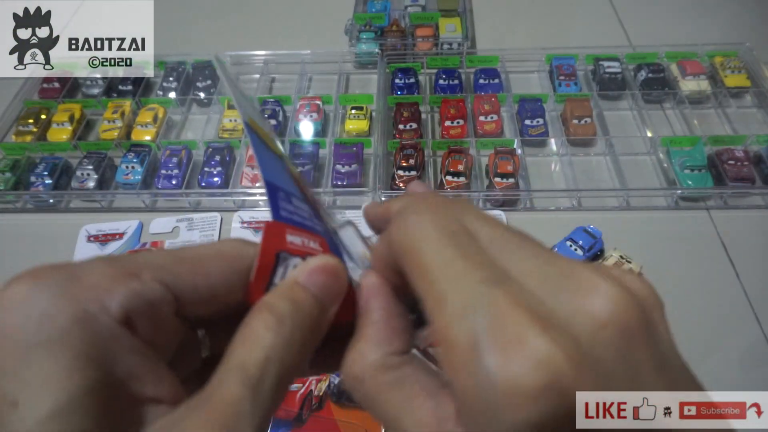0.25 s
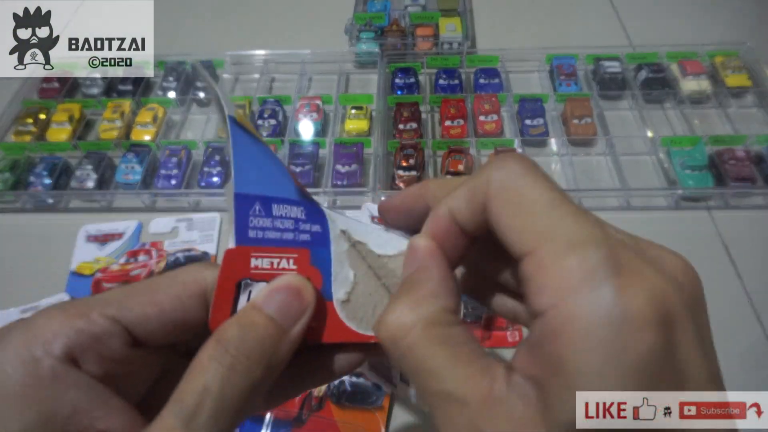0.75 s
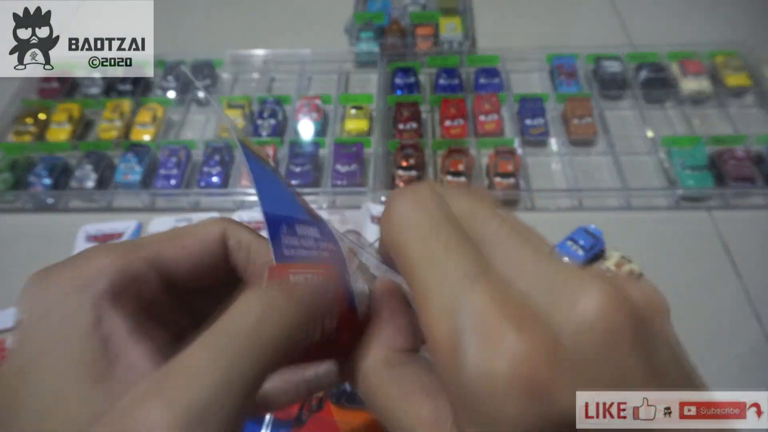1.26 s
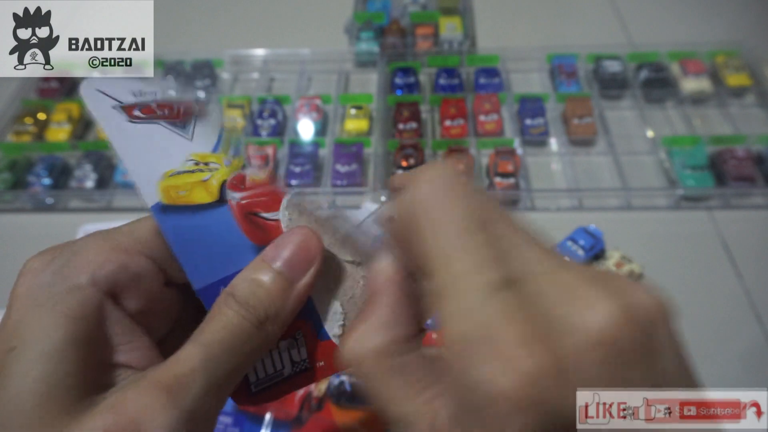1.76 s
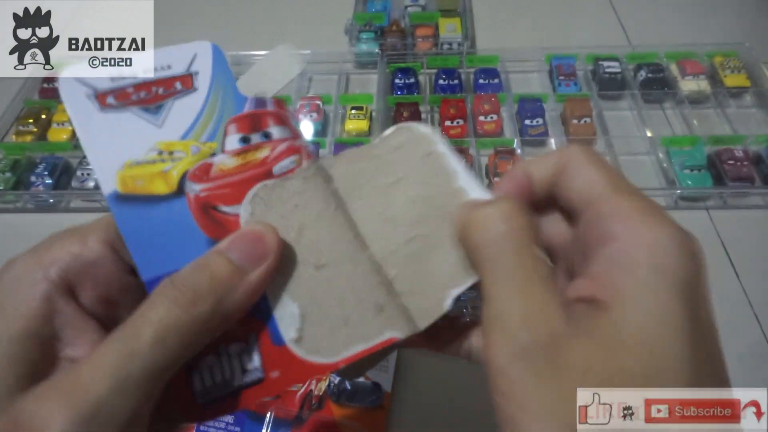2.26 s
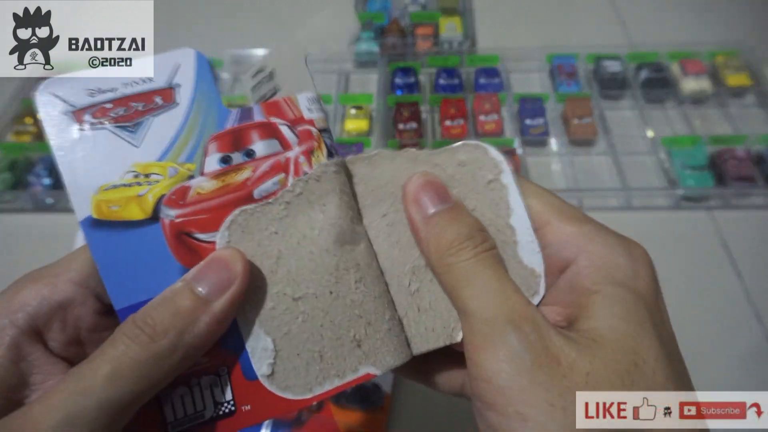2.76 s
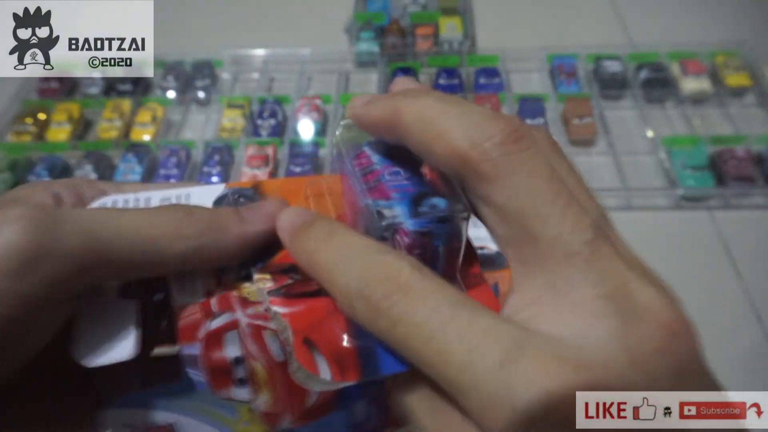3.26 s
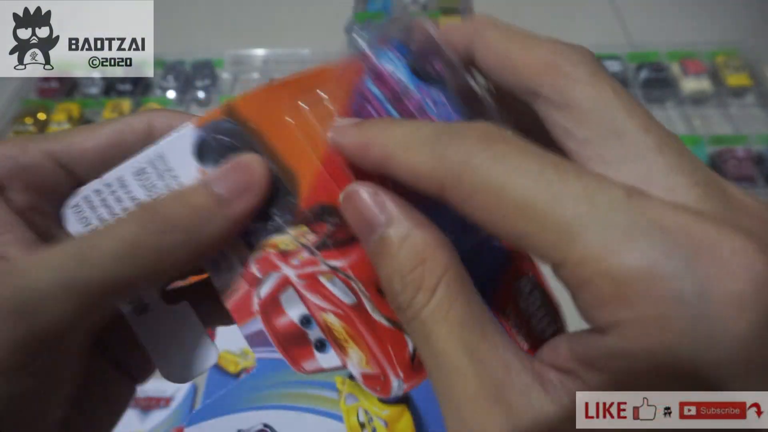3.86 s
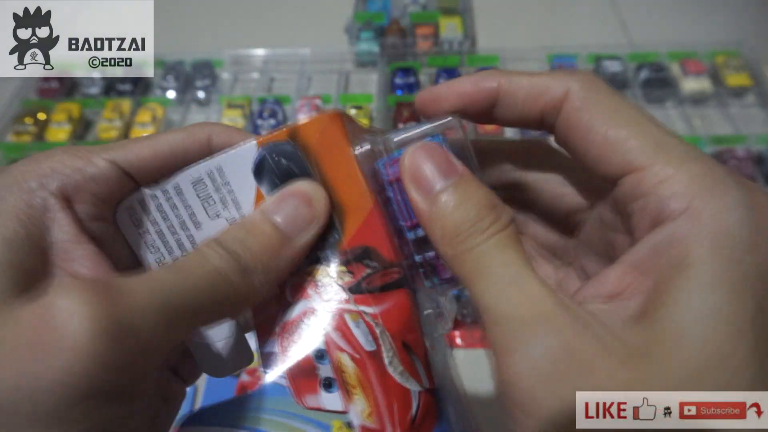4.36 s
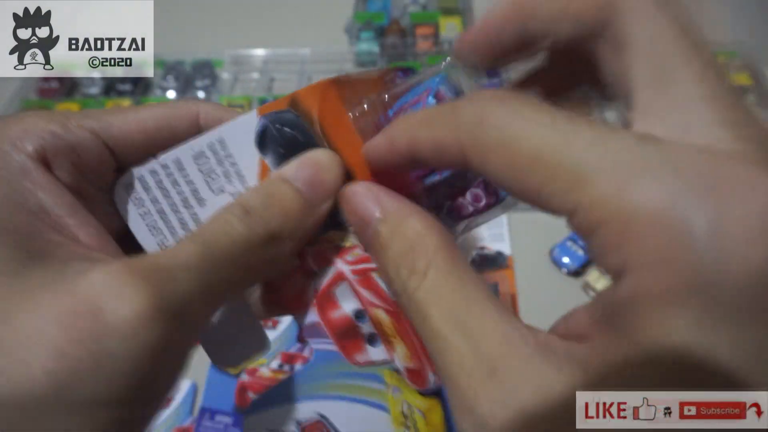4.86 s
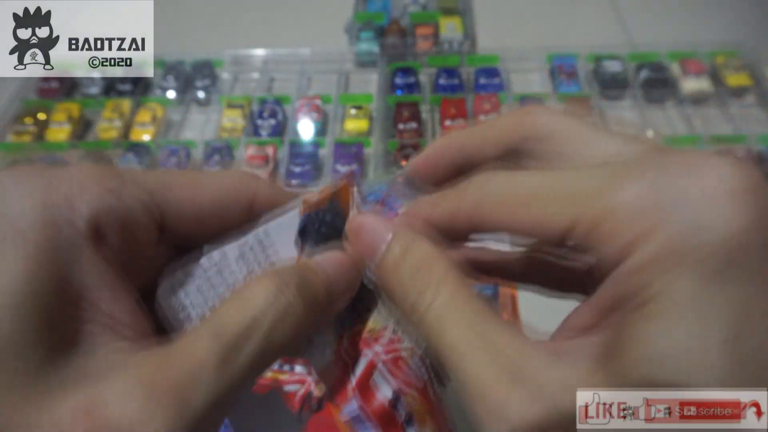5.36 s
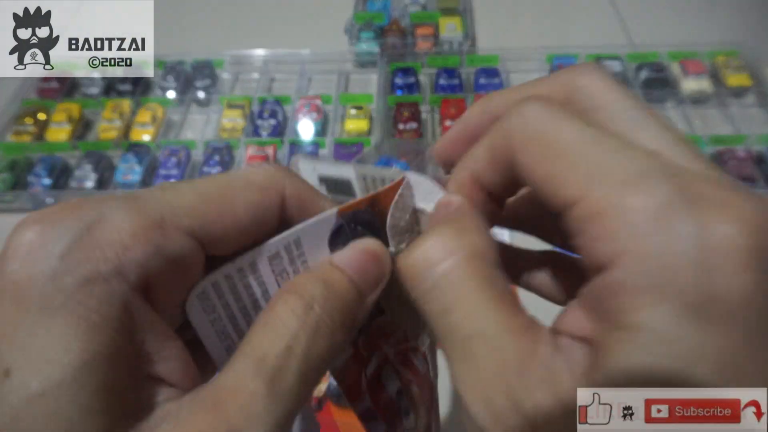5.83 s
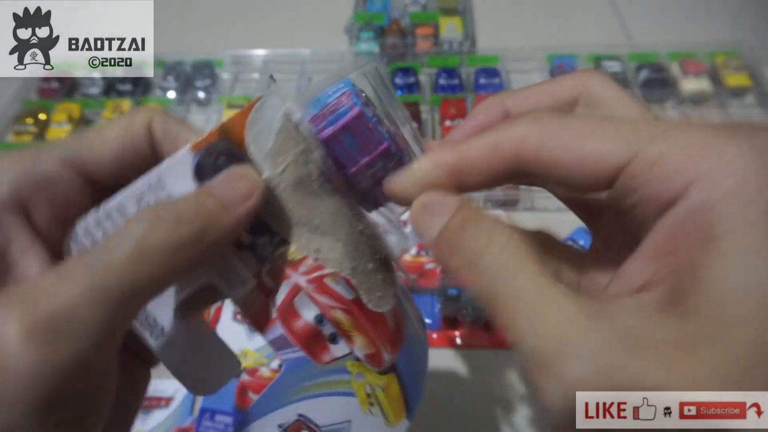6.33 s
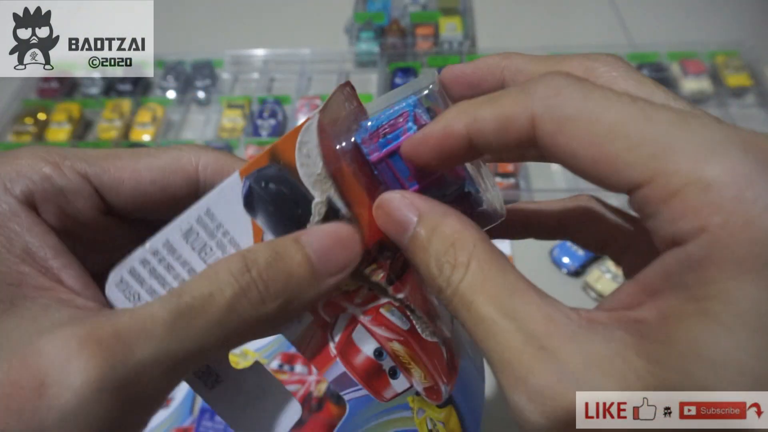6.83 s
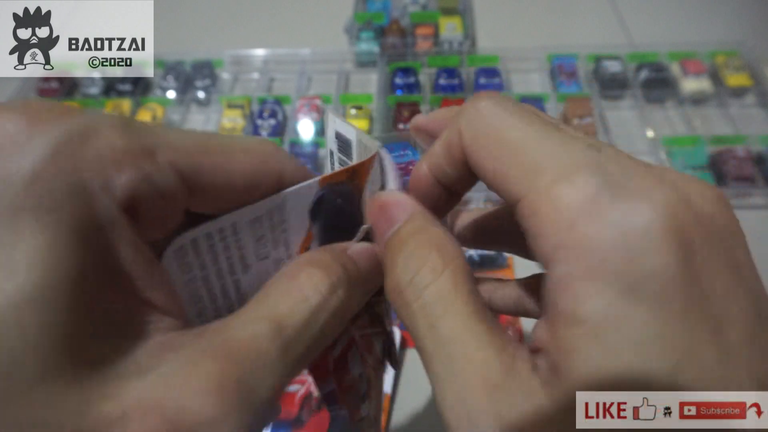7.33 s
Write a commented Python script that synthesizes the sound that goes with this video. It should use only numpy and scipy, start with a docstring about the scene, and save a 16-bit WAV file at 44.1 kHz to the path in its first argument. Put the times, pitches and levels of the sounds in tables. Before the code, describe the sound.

Crisp dry ticks of glue letting go lead into rough cardboard tearing and loud buckling of thin plastic, all near the microphones and slightly stronger on the right in its lower body. Handling rustles and scattered bright clicks with dull card thumps continue, with sparse small peels later. Soft fan air and low motor hum stay underneath; a very faint high whine appears at the close.

```python
"""Two hands pull the cardboard backing off a plastic blister pack, close to the microphones in a small room.
Glue crackles in short first pulls, with a few snaps; from about 1.7 s the backing tears hard.
Then come rubbing fingers, many ringing snaps of the bending shell, and more short peels up to the end.
Tearing is made of dense tiny noise bursts; each snap is a click, a short ring and a dull push.
A fan hums behind it all, and a very faint whine comes up in the last second."""
import sys
import numpy as np
from scipy import signal
from scipy.fft import rfft, irfft
from scipy.io import wavfile
from scipy.ndimage import uniform_filter1d

SR = 44100
rng = np.random.default_rng(int(sys.argv[2]) if len(sys.argv) > 2 else 0)


def unload_wav(signal):
    """Save mono or channel-first audio to the path in sys.argv[1] as 16-bit WAV at rate SR, clipped to [-1, 1]."""
    wavfile.write(
        sys.argv[1],
        SR,
        np.round(np.clip(np.atleast_2d(signal).T, -1, 1) * 32767).astype(np.int16),
    )


N = 334719
TIME = np.arange(N) / SR

# Pack levels below are set before the hollow, the room and the final mix.
# pulls that peel the backing: [start t/s, length t/s, glue level/dB, fibre level/dB,
# flexing card level/dB, swell from start to end level/dB]
PEELS = [(.16, 0.16, -46, -64, -63, 23), (0.297, .13, -33, -49.5, -62, 0.5),
         (.44, 0.17, -42.5, -54.5, -68, 3), (0.572, 0.22, -33, -42.5, -55, 8),
         (1.728, 0.045, -30.5, -37, -40.5, 1.5), (1.781, 0.051, -26.5, -25.5, -34.5, 1.5),
         (1.853, .115, -32.5, -38.5, -39, 6), (1.97, .19, -30, -34, -33.5, 0.5),
         (2.167, 0.05, -25, -27.5, -28.5, -0.5), (2.462, 0.084, -40, -34.5, -30.5, -2),
         (2.568, 0.098, -40, -38.5, -39, 0.5), (2.671, 0.15, -34, -38, -38, 5),
         (4.542, 0.012, -31, -39, -42.5, -3.5), (5.169, .1, -38.5, -43, -48, 1.5),
         (5.796, 0.04, -33.5, -36, -44.5, -1), (6.016, .14, -38.5, -43, -48, 2.5),
         (6.233, .026, -41, -39, -38, 4), (6.266, 0.073, -41, -38, -37.5, -2.5),
         (7.386, 0.11, -34.5, -46.5, -50.5, 2), (7.474, 0.14, -36, -39.5, -44, 2.5)]
PEEL_ATTACK_S, PEEL_RELEASE_S = 0.014, 0.027
# fingers slide and regrip on the shell: [start t/s, length t/s, level/dB, brightness level/dB]
RUBS = [(0.913, .1, -51, 4), (1.149, .15, -46, 1.5), (1.345, 0.074, -50, 2), (1.578, .015, -48.5, -1),
        (2.292, 0.087, -42.5, -8), (2.913, 0.087, -40.5, -3), (3.022, 0.097, -49, -6),
        (3.144, .4, -53.5, -3), (3.283, 0.058, -39, -3), (3.39, 0.047, -46.5, -5),
        (3.536, 0.014, -44.5, -4), (3.605, .17, -40.5, -10), (3.838, 0.062, -47.5, -5),
        (3.966, 0.14, -50, -0.5), (4.13, 0.2, -60, 8), (4.665, 0.075, -45.5, -6.5),
        (4.902, 0.076, -38, -12), (5.007, 0.051, -49, -2.5), (5.292, 0.14, -60.5, 11.5),
        (5.487, 0.3, -61.5, 7), (5.875, 0.23, -55, 3), (6.352, 0.076, -42, -6.5), (6.504, .03, -47, -5.5),
        (6.571, 0.11, -47, -2.5), (6.697, .02, -45.5, 4), (6.793, 0.052, -47.5, -2.5),
        (6.968, 0.11, -54.5, 0), (7.291, .08, -62.5, 10)]
RUB_ATTACK_S, RUB_RELEASE_S, RUB_SWELL_DB = 0.012, 0.028, -2.5
RUB_FIBRE_DB, RUB_FIBRE_SHARE = -0.5, 0.55  # the fibres' scrape follows this share of the brightness
HOLD_DB = -63.5  # the pack never lies quite still in the hands


def pulling():
    """How hard card, fibres and glue are worked; the strongest move of the moment leads."""
    work = np.full((3, N), undb(HOLD_DB))
    for start, length, glue_db, fibre_db, flex_db, swell_db in PEELS:
        shape = stroke(start, length, swell_db, PEEL_ATTACK_S, PEEL_RELEASE_S)
        levels = undb([flex_db, fibre_db, glue_db])
        work = np.maximum(work, np.outer(levels, shape))
    for start, length, db, bright_db in RUBS:
        shape = stroke(start, length, RUB_SWELL_DB, RUB_ATTACK_S, RUB_RELEASE_S)
        fibre_db = db + RUB_FIBRE_DB + RUB_FIBRE_SHARE * bright_db
        levels = undb([db, fibre_db, db + bright_db])
        work = np.maximum(work, np.outer(levels, shape))
    return work


def stroke(start, length, swell_db, attack, release):
    """Envelope of one move of the hand: it takes hold, swells or eases, and dies away."""
    t = TIME - start
    rise = np.minimum(t, 0) / attack
    fall = np.maximum(t - length, 0) / release
    progress = np.clip(t / length, 0, 1)
    return np.exp(rise - fall) * undb(swell_db * (progress - 0.5))


# colour of the flexing card and shell: [f/Hz, relative level/dB]
FLEX = [(100, -48), (250, -9.5), (460, -6), (750, 1.5), (1100, 2), (1450, -1), (1800, 6), (2250, 5),
        (2750, 4), (3400, 4.5), (4800, -8), (8000, -32.5)]
# colour of breaking fibres: [f/Hz, relative level/dB]
FIBRE = [(1200, -41), (2400, -4), (3400, -1), (5000, 1), (6300, -4.5), (7800, -5.5), (10000, -7.5),
         (16000, -40)]
# colour of glue letting go: [f/Hz, relative level/dB]
GLUE = [(3000, -54.5), (6300, -3.5), (8500, 3.5), (11000, 3), (13000, 5), (16000, -2.5)]


def tearing(flex, fibre, glue, crinkle=0.23):
    """Larger breaks jolt glue, fibres and card together; smaller slips in each go their own way.

    A harder pull packs most of them closer together."""
    effort = np.clip(np.hypot(flex, fibre) / undb(-40), 0.3, 6)
    # whole fibre bundles give way and jolt every part of the pack
    bundles = slips(rate=420 * np.sqrt(effort), spread_db=5, t60=0.003)

    card_slips = slips(rate=700 * effort, spread_db=1.5, t60=0.03)
    flexing = bent(0.68 * bundles + card_slips, FLEX, bend=0.092, rate=8.9)
    flexing += crinkle * crinkles(rate=140 * effort, centre_hz=1917, spread_octaves=0.4108,
                                  t60=0.02, spread_db=8.0)

    fibre_slips = slips(rate=2500 * effort, spread_db=-1, t60=0.0075)
    breaking = bent(0.5 * bundles + fibre_slips, FIBRE, bend=0.1, rate=16)

    # spots of glue pop off one by one above the fine hiss of the peel
    spots = slips(rate=260 * np.sqrt(effort), spread_db=5, t60=0.0012)
    hiss = slips(rate=6800, spread_db=2.5, t60=0.003)
    peeling = through(0.7 * bundles + 0.87 * spots + hiss, response(GLUE))

    grip = unit(undb(1.56 * walk(rate=55)))  # the pull advances in small jerks
    return grip * (flex * unit(flexing) + fibre * breaking + glue * unit(peeling))


def slips(rate, spread_db, t60, count=28):
    """Tiny fractures of unequal size, rate a second at even power; each is a short burst of micro-cracks."""
    happens = rng.random(N) < rate / SR
    sizes = happens / np.sqrt(rate) * undb(spread_db * np.minimum(rng.standard_normal(N), 2))
    family = rng.integers(0, count, N)  # which of the ready-made bursts each slip uses
    t = TIME[:SR // 50]
    bursts = rng.standard_normal((count, len(t))) * fade(t, t60)
    return unit(sum(through(sizes * (family == k), unit_energy(bursts[k])) for k in range(count)))


def bent(x, colour, bend, rate, count=4):
    """Bending stiffens and slackens the sheet, so that its resonances wander up and down."""
    stretches = np.exp(np.linspace(-bend, bend, count))
    shapes = [response([(hz * k, db) for hz, db in colour]) for k in stretches]
    return unit(shifting(x, shapes, rate))


def crinkles(rate, centre_hz, spread_octaves, t60, spread_db):
    """Small creases pop one after another, each with a brief pitch of its own."""
    out, t = np.zeros(N + SR), TIME[:SR // 25]
    starts = np.flatnonzero(rng.random(N) < rate / SR)
    chance = np.clip(rng.standard_normal((len(starts), 2)), -2, 2)
    for start, (pitch, size) in zip(starts, chance):
        hz = centre_hz * 2 ** (spread_octaves * pitch)
        out[start:start + len(t)] += undb(spread_db * size) * np.cos(2 * np.pi * hz * t) * fade(t, t60)
    return unit(out[:N])


# the shell buckles: [t/s, snap level/dB, ring f/Hz, brightness level/dB against the snap]
SNAPS = [(.159, -54, 2500, -2), (.6389, -48.5, 1460, 9), (.909, -43.5, 1470, -9), (.9515, -32.5, 2130, 4),
         (1.0065, -46, 1600, -8), (1.0348, -43.5, 970, -14), (1.1264, -38, 1360, -13),
         (1.1987, -39.5, 2550, -4), (1.4064, -38, 2797, -7.5), (1.588, -45, 2130, -3.5),
         (1.7671, -28, 3580, 2.5), (1.7739, -30, 3480, 2), (1.985, -36.5, 3430, 5.5),
         (2.2169, -24, 1996, -6), (2.2671, -29.5, 2650, -3.5), (2.3159, -30, 2340, -26),
         (2.3804, -34, 1040, -14), (2.462, -24.5, 1480, -11), (2.4702, -24, 3240, -27),
         (2.4958, -27, 1550, -11), (2.5069, -28.5, 1370, -5), (2.5461, -26, 1500, -8),
         (2.6234, -32, 2415, 0), (2.838, -27, 3210, -22), (2.9262, -24, 2290, -10.5),
         (3.0627, -34.5, 2184, -6.5), (3.3841, -36, 1505, -13), (3.4034, -42, 1490, 7),
         (3.479, -42, 1513, -21), (3.6218, -32, 2510, -8.5), (3.6492, -34.5, 1510, -10),
         (3.6971, -35.5, 2520, 0.5), (3.7293, -31, 1270, -14.5), (3.7596, -30, 1480, -17),
         (3.767, -29, 2290, -15.5), (3.8418, -44, 1406, -19), (3.873, -43.5, 1365, -16),
         (4.008, -39.5, 1400, -16), (4.051, -38.5, 1380, -10), (4.0745, -39.5, 1450, -15),
         (4.0933, -34, 1327, -6), (4.2438, -24.5, 2010, -11.5), (4.2478, -35, 1420, -5),
         (4.5641, -30.5, 993, -5.5), (4.662, -29, 2270, -12), (4.7068, -29, 2140, -7.5),
         (4.7994, -29.5, 1300, -13.5), (4.8055, -34, 1530, -15), (4.9132, -37, 2470, -14),
         (4.9401, -36, 3124, -28), (4.9828, -34.5, 2380, -5), (5.1474, -24, 2930, -11.5),
         (5.1698, -32, 2830, -12), (5.8658, -39.5, 3520, -3), (6.261, -28.5, 1528, 2),
         (6.4796, -30, 1218, -15), (6.5078, -32, 1670, -27.5), (6.5642, -35, 1580, -6),
         (6.5693, -33, 890, -14), (6.6033, -28, 1560, -7.5), (6.8447, -41.5, 1730, -15),
         (7.1304, -37, 1155, -35), (7.483, -27, 2795, -3), (7.5274, -34.5, 1320, -18)]
# modes of a buckling facet: [multiple of its ring pitch, relative level/dB]
FACET = [(.66, -4), (1.001, 10), (1.21, 2.5), (1.53, -0.5), (2.1, -5.5)]
# dull push of the card when the shell gives: [f/Hz, relative level/dB]
THUD = [(40, -23), (150, -7.5), (280, 5.5), (460, 14), (700, 6), (1200, -33), (4000, -30)]
RING_CYCLES = 21  # a facet rings for this many cycles, so that low ones last longer
SNAP_THUD_DB = -17.5  # the push on the card, against the ring and crease
SNAP_CRACK_DB, SNAP_CRACK_SHARE = 3.5, 0.81  # the crack rises by this share of the brightness
EVENT_TIME = TIME[:SR // 12]  # room for one snap, pop or knock


def snaps(flex):
    """A facet flips: a sharp crack and tick, a few cycles of its own ring, and a push on the card."""
    out, t = np.zeros(N + SR), EVENT_TIME
    thud_h, flex_h = response(THUD), response(FLEX)
    swing = 1 - np.exp(-t / 0.00025)  # the facet takes a moment to flip
    radiation = signal.butter(2, 500, "high", fs=SR, output="sos")  # so small a sheet gives off little bass
    for s, snap_db, hz, bright_db in list(SNAPS) + lesser_snaps(flex):
        detune = 1 + 0.061 * rng.standard_normal(len(FACET))
        detune[1] = 1  # the main mode keeps its pitch
        ring = sum(undb(db) * np.sin(2 * np.pi * hz * k * d * t) for (k, db), d in zip(FACET, detune))
        ring = unit_energy(ring * swing * fade(t, RING_CYCLES / hz))
        scrape = 0.65 * burst(flex_h, 0.018, first=0.7)  # the crease runs on through the sheet
        snap = unit_energy(signal.sosfilt(radiation, ring + scrape))
        snap += undb(SNAP_THUD_DB) * burst(thud_h, 0.031, first=2.26)
        snap += click(SNAP_CRACK_DB + SNAP_CRACK_SHARE * bright_db, bright_db)
        add_event(out, s, snap_db, snap)
    return out[:N]


# lesser facets: level against the flexing, pitch spread around a centre
LESSER_PER_S, LESSER_DB, LESSER_SPREAD_DB, LESSER_HZ, LESSER_BRIGHT_DB = 32, -2.5, 2.5, 1936, -4


def lesser_snaps(flex, spread_octaves=0.415):
    """Small buckles at random moments, as strong as the shell is flexed; rows like those of SNAPS."""
    starts = np.flatnonzero(rng.random(N) < LESSER_PER_S / SR)
    chance = np.clip(rng.standard_normal((len(starts), 2)), -2, 2)
    rows = []
    for i, (size, pitch) in zip(starts, chance):
        db = 20 * np.log10(flex[i]) + LESSER_DB + LESSER_SPREAD_DB * size
        rows.append((i / SR, db, LESSER_HZ * 2 ** (spread_octaves * pitch), LESSER_BRIGHT_DB))
    return rows


# a large spot of glue lets go: [t/s, level/dB]
POPS = [(.278, -32), (.303, -27), (.3808, -32), (0.414, -23.5), (.439, -27.5), (0.5788, -28.5),
        (0.591, -29), (4.4925, -33.5), (4.544, -28.5), (5.214, -29.5), (5.273, -34), (5.8242, -29.5),
        (5.929, -43.5), (6.091, -30.5), (7.0201, -40), (7.381, -26.5), (7.4643, -28), (7.5738, -25.5)]
POP_CRACK_DB = -15  # the fibres that it takes along, against the tick


def glue_pops(glue):
    """A spot of glue lets go with a bright tick and pulls a few fibres with it."""
    out = np.zeros(N + SR)
    for s, db in list(POPS) + lesser_pops(glue):
        add_event(out, s, db, click(POP_CRACK_DB, 0))
    return out[:N]


LESSER_POPS_PER_S, LESSER_POP_DB, LESSER_POP_SPREAD_DB = 30, -1.5, 3  # level against the peel


def lesser_pops(glue):
    """Smaller spots of glue let go at random moments, as strong as the peel; rows like those of POPS."""
    starts = np.flatnonzero(rng.random(N) < LESSER_POPS_PER_S / SR)
    sizes = np.clip(rng.standard_normal(len(starts)), -2, 2)
    levels = 20 * np.log10(glue[starts]) + LESSER_POP_DB + LESSER_POP_SPREAD_DB * sizes
    return list(zip(starts / SR, levels))


# the card takes a hard push: [t/s, level/dB, pitch f/Hz]
KNOCKS = [(.9515, -31.5, 666), (1.209, -42, 486), (2.3005, -37, 512), (2.462, -37, 439.6),
          (2.4708, -41, 300), (2.5462, -35.5, 488), (2.9251, -40, 362), (3.6214, -25, 456),
          (3.6286, -35, 319), (3.6976, -45, 460), (3.7399, -41, 480), (4.5641, -41.5, 498),
          (4.9848, -42, 463), (5.1474, -32.5, 734), (5.1583, -41, 730), (5.1698, -40, 734),
          (7.483, -32, 860), (7.5274, -43, 805)]
THUD_HZ = 460  # the pitch at which THUD is strongest


def knocks():
    """A hard push makes the card thump, with the thud's colour moved to each knock's pitch."""
    out = np.zeros(N + SR)
    for s, db, hz in KNOCKS:
        colour = [(f * hz / THUD_HZ, gain) for f, gain in THUD]
        add_event(out, s, db, burst(response(colour), 0.034, first=1.47))
    return out[:N]


def burst(h, t60, first):
    """One main jump followed by dying micro-cracks, heard through a response."""
    force = unit_energy(rng.standard_normal(len(EVENT_TIME)) * fade(EVENT_TIME, t60))
    force[0] += first
    return unit_energy(through(force, h))


def click(crack_db, tick_db):
    """The crack of the fibres and the bright tick on top of it."""
    crack = burst(response(FIBRE), 0.0086, first=0.61)
    tick = burst(response(GLUE), 0.0026, first=1.0)
    return undb(crack_db) * crack + undb(tick_db) * tick


EVENT_SPAN_S = 0.008  # a level means the rms that unit energy has over this time


def add_event(out, s, db, sound):
    """Add one short sound at its moment."""
    start = int(s * SR)
    out[start:start + len(sound)] += undb(db) * sound * np.sqrt(EVENT_SPAN_S * SR)


# modes of the hollow blister: [f/Hz, relative level/dB, time to fade by 60 dB t/s]
HOLLOW = [(1394, 4.5, 0.046), (1535, -1.5, 0.047), (2130, -6, 0.02), (2435, -2.5, 0.035),
          (3440, -10, 0.026), (4970, -8, 0.034)]


def hollow(x, ring_db=-18):
    """The air and walls of the blister ring on after every slip and snap."""
    t = TIME[:SR // 4]
    h = sum(undb(db) * np.cos(2 * np.pi * hz * t) * fade(t, t60) for hz, db, t60 in HOLLOW)
    return x + undb(ring_db) * through(x, unit_energy(h))


# highest treble, mostly up while glue peels and down while fingers handle the shell: [t/s, level/dB]
SHEEN = [(.3, 3), (1.2, -4.5), (1.8, 0), (2.8, 2), (3.3, -5), (4.3, -1.5), (5.3, 0.5), (5.8, 5.5),
         (6.15, 6.5), (6.5, -5), (7.59, -3)]
SHEEN_HZ = 12790


def sheen(x):
    """The highest treble rises and falls."""
    top = signal.sosfiltfilt(signal.butter(3, SHEEN_HZ, "high", fs=SR, output="sos"), x)
    return x + top * (undb(np.interp(TIME, *np.transpose(SHEEN))) - 1)


# where the hands hold the pack: [t/s, treble left minus right level/dB]
PLACE = [(0, -1.5), (.87, -2.5), (1.75, 0), (2.03, -3), (7.59, -3)]


def placed(x, shadow_hz=3300):
    """The hands shade the treble on one side or the other as they turn the pack."""
    treble = signal.sosfiltfilt(signal.butter(3, shadow_hz, "high", fs=SR, output="sos"), x)
    lean = np.interp(TIME, *np.transpose(PLACE))
    return x + treble * (undb(np.array([lean, -lean]) / 2) - 1)


ROOM_LOW_T60, ROOM_HIGH_T60, ROOM_DB = 0.44, 0.43, -11.5  # fading times in s; level against the direct sound


def room(x, near_db=-4.5, near_t60=0.03, near_hz=4000, split_hz=3500, count=6):
    """The moving hands scatter the treble differently to each side; the walls add a short tail."""
    t = TIME[:SR // 2]
    noise = rng.standard_normal((2, len(t)))
    dull = signal.sosfilt(signal.butter(2, split_hz, fs=SR, output="sos"), noise)
    tails = dull * fade(t, ROOM_LOW_T60) + 0.84 * (noise - dull) * fade(t, ROOM_HIGH_T60)
    tails *= np.clip(t / 0.005, 0, 1)  # the tail builds up over 5 ms
    walls = np.array([through(x, h) for h in unit_energy(tails)])

    t = TIME[:SR // 20]
    scatter = rng.standard_normal((2, count, len(t))) * fade(t, near_t60)
    scatter = signal.sosfilt(signal.butter(1, near_hz, "high", fs=SR, output="sos"), scatter)
    hands = np.array([shifting(x, paths, rate=14) for paths in unit_energy(scatter)])
    return x + undb(ROOM_DB) * walls + undb(near_db) * hands


# colour of the fan's air: [f/Hz, relative level/dB]
AIR = [(30, -25), (100, -20.5), (230, -3), (303, -4.5), (384, -3.5), (616, -9), (801, -5), (889, -6.5),
       (1100, -10), (1720, -14.5), (2060, -9.5), (2540, -16.5), (6900, -20.5), (12600, -22), (16000, -24.5)]
AIR_DB = -53.5
# fan motor tones: [f/Hz, rms level/dB]
HUM = [(310.3, -58.5), (375, -94), (532, -72.5), (738, -71.5), (886.5, -61.5), (930.5, -68.5)]


def fan():
    """Steady air noise, alike on both sides in the bass, with motor tones of slightly unsteady pitch."""
    mid, side = (through(rng.standard_normal(N), response(AIR)) for _ in range(2))
    side = signal.sosfilt(signal.butter(1, 2500, "high", fs=SR, output="sos"), side)
    air = mid + 0.98 * side * np.array([[1], [-1]])
    hum = 0
    for hz, db in HUM:
        phase = 2 * np.pi * np.cumsum(hz + 0.858 * walk(rate=8)) / SR
        hum = hum + np.sqrt(2) * undb(db) * np.sin(phase)
    return undb(AIR_DB) * air + hum


# thin whine: [t/s, rms level/dB]
WHINE = [(0, -81), (6.75, -79), (6.95, -67), (7.59, -65.5)]
WHINE_HZ = 7600


def whine():
    """A thin high tone of slightly unsteady pitch comes up near the end."""
    phase = 2 * np.pi * np.cumsum(WHINE_HZ + 4 * walk(rate=65)) / SR
    return np.sqrt(2) * undb(np.interp(TIME, *np.transpose(WHINE))) * np.sin(phase)


def undb(db):
    """Decibels to gain."""
    return 10 ** (np.asarray(db) / 20)


def unit(x):
    """Scale to rms 1."""
    return x / np.sqrt(np.mean(x ** 2))


def unit_energy(x):
    """Scale a response so that it passes white noise at the same power."""
    return x / np.sqrt(np.sum(x ** 2, axis=-1, keepdims=True))


def on_log_axis(hz, points):
    """Read (Hz, value) points on a log-frequency axis."""
    f, value = np.transpose(points)
    return np.interp(np.log(hz + 1), np.log(f), value)


def response(points, size=4096):
    """Impulse response with the given colour that starts at once (minimum phase)."""
    gain = undb(on_log_axis(np.fft.rfftfreq(size, 1 / SR), points))
    cepstrum = irfft(np.log(gain))
    # folding the later half onto the first packs the energy at the start
    cepstrum[1:size // 2] *= 2
    cepstrum[size // 2 + 1:] = 0
    return unit_energy(irfft(np.exp(rfft(cepstrum)))[:size // 2])


def through(x, h):
    """Pass a sound through a response, keeping its length."""
    return signal.oaconvolve(x, h)[:len(x)]


def shifting(x, responses, rate):
    """Pass a sound through a response that drifts at random between several shapes."""
    weights = np.array([undb(10 * walk(rate)) for h in responses])
    mix = sum(w * through(x, h) for w, h in zip(weights, responses))
    return mix / np.sqrt(np.sum(weights ** 2, axis=0))


def fade(t, t60):
    """Exponential decay by 60 dB in t60 seconds."""
    return np.exp(-np.log(1000) * t / t60)


def walk(rate):
    """Random levels that glide to a new value every 1 / rate s, scaled to rms 1."""
    k = max(int(SR / rate), 2)
    steps = np.repeat(rng.standard_normal(N // k + 1), k)[:N]
    return unit(uniform_filter1d(steps, k))


def scene(pack_db=-2.28):
    """The pack in the room, over the fan and the whine."""
    flex, fibre, glue = pulling()
    pack = tearing(flex, fibre, glue) + snaps(flex) + glue_pops(glue) + knocks()
    pack = sheen(hollow(pack))
    return undb(pack_db) * placed(room(pack)) + fan() + whine()


# the microphone pair favours the right in the lows and mids: [f/Hz, left minus right level/dB]
BALANCE = [(100, -4.5), (1300, -4), (2400, -3.5), (4500, 0.5), (8000, 1.5), (15000, -0.4)]
LOW_CUT_HZ, TOP_HZ = 51, 16200


def record(dry):
    """Two unequal microphone ports, a low cut and a steep cut at the top."""
    lean = on_log_axis(np.fft.rfftfreq(N, 1 / SR), BALANCE)
    ports = irfft(rfft(dry) * undb(np.array([lean, -lean]) / 2), N)
    ports = signal.sosfilt(signal.butter(2, LOW_CUT_HZ, "high", fs=SR, output="sos"), ports)
    return signal.sosfilt(signal.ellip(10, 0.2, 75, TOP_HZ, fs=SR, output="sos"), ports)


dry = scene()
out = record(dry)
unload_wav(out)
```